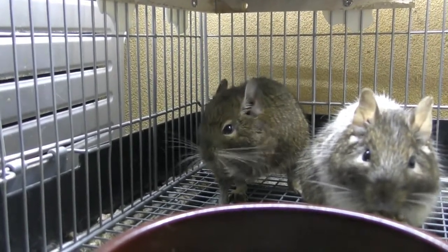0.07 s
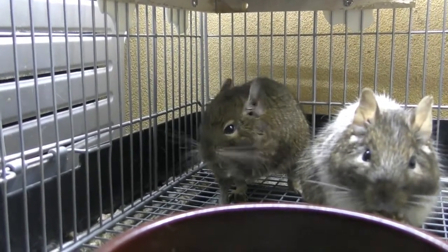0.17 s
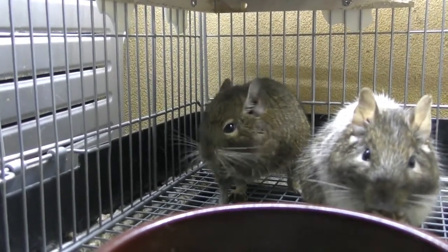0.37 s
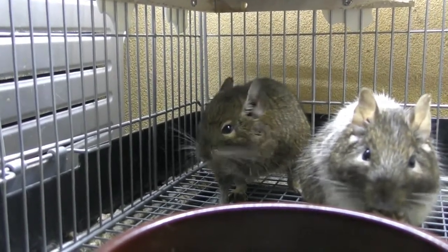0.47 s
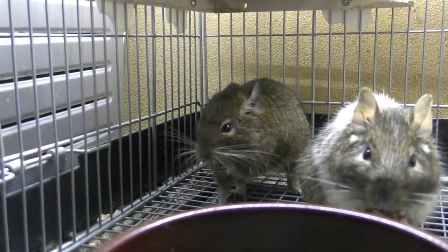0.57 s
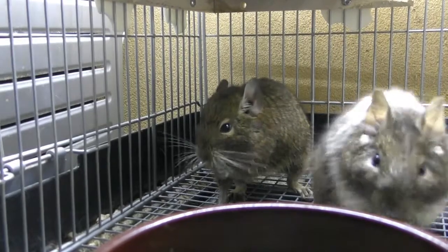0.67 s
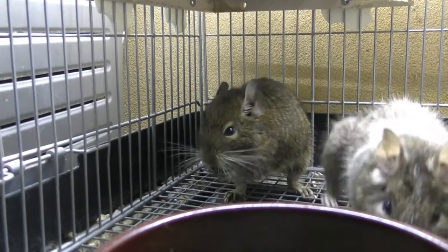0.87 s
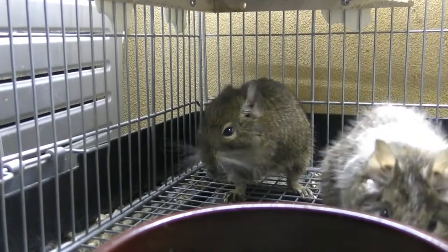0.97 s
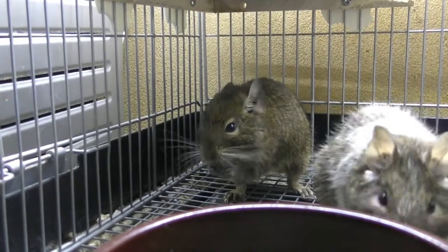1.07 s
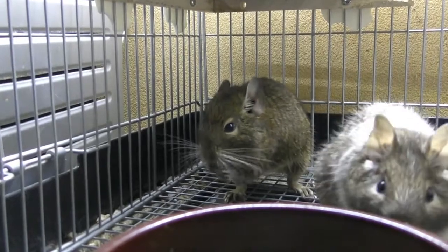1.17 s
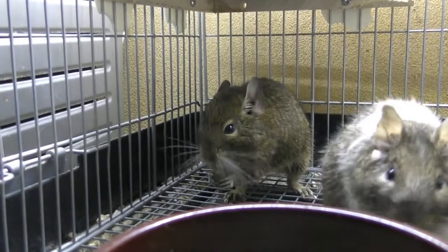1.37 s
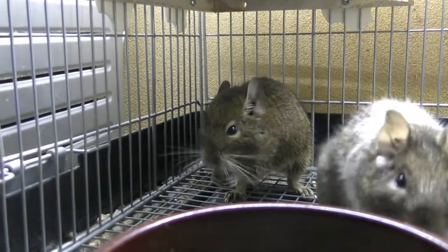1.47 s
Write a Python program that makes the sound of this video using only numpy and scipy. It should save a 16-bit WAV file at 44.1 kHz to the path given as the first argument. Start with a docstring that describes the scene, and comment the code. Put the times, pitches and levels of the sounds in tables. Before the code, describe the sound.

A small rodent gives three sharp, high, slightly raspy squeaks close by in a wire cage, at about 0.3, 0.6 and 1.1 seconds, each very brief and rising in pitch. Feet tick lightly on the mesh between the first two, clearest just before 0.6 seconds. Faint sniffs come about five times a second throughout. A low room noise dips at each squeak and swells back.

```python
"""Degu alarm squeaks

A degu in a wire cage gives three sharp, close squeaks: each reaches about 3.9 kHz, holds and breaks up,
its vocal folds ringing through the throat and rasping where they turn rough. Feet tick on the mesh,
and soft sniff-like puffs come about five times a second. A low room noise lies underneath;
the camera's gain control ducks it at each squeak and lets it swell back."""
import sys
import numpy as np
from scipy import signal
from scipy.fft import rfft, irfft, next_fast_len
from scipy.io import wavfile
from scipy.ndimage import uniform_filter1d, minimum_filter1d, map_coordinates

SR = 44100
rng = np.random.default_rng(int(sys.argv[2]) if len(sys.argv) > 2 else 0)


def store_pcm(level_fs):
    """Save levels as 16-bit WAV."""
    pcm = np.round(np.clip(level_fs, -1, 1) * 32767).astype(np.int16)
    wavfile.write(sys.argv[1], SR, np.atleast_2d(pcm).T)


N = 66150


def squeak(contour, harmonics=5):
    """Vocal-fold overtones shaped by the throat; rough stretches jitter, rasp and split."""
    # throat resonances: f/Hz, level/dB
    throat = [(2200, -13.5), (3050, -12), (3600, -21), (3860, -4), (4200, -14), (4600, -22.5), (5300, -3),
              (5720, -8.5), (6000, -4), (6500, -3.5), (7400, -3), (8300, -4.5), (9000, -2), (11200, 0),
              (12600, -4), (13600, -1.5), (15500, -13.5)]
    # how far the high overtones swing between the microphones: f/Hz, swing/dB
    beam = [(4000, 1.5), (8000, -0.5), (11500, 2), (15500, 4.5)]
    # the folds briefly alternate strong and weak cycles: start/s, end/s, gain of the in-between tones
    split = (.608, .640, .2)
    jitter, shimmer_db, rasp_db, rough_split = .05, 4, -10, .31  # at full roughness
    jitter_hz, flutter_hz, flutter_db = 1200, 170, 2.02
    swing_hz, left_lean, swing_rad_per_db = 82, .35, .12
    attack_s, release_s, dull_s, dull_db_per_octave = .00096, .0052, .016, -5

    t = np.arange(N) / SR
    times, *columns = np.transpose(contour)
    pitch, db, rough = [np.interp(t, times, column) for column in columns]
    rough = np.clip(rough, 0, 1)
    begin, end, share = split
    split_gain = rough_split * rough + share * np.sin(np.pi * np.clip((t - begin) / (end - begin), 0, 1))
    tilt = dull_db_per_octave * np.clip(1 + (t - times[-1]) / dull_s, 0, 1)  # the ending darkens
    phase = 2 * np.pi * np.cumsum(pitch * (1 + jitter * rough * wobble(jitter_hz))) / SR

    def partial(k):
        """The tone at k times the pitch, wavering on its own in level and stereo position."""
        hz = k * pitch
        level = amp(along(throat, hz) + tilt * np.log2(k) + flutter_db * wobble(flutter_hz))
        swing_db = along(beam, hz)
        turn = np.outer([1, -1], swing_rad_per_db * swing_db * wobble(swing_hz))
        balance = pan(swing_db * (left_lean + wobble(swing_hz)))
        return level * (hz < SR / 2) * balance * np.sin(k * phase + turn + 2 * np.pi * rng.random())

    voice = sum(partial(k) for k in range(1, harmonics + 1))
    voice += split_gain * sum(partial(k + .5) for k in range(1, harmonics))
    voice *= amp(shimmer_db * rough * wobble(jitter_hz))
    air = noise(lambda hz: amp(along(throat, hz)) * hz ** 4 / (hz ** 4 + 3050 ** 4))  # low cut
    rasp = amp(rasp_db) * rough * (1 + np.cos(phase)) * air  # pulses with the folds
    attack = np.clip((t - times[0]) / attack_s, 0, 1)
    release = np.exp(-np.maximum(t - times[-1], 0) / release_s)
    return amp(db) * attack * release * (voice + rasp)


def alarm_calls():
    """The degu's three squeaks, each with its own rise and break-up."""
    # one contour per squeak: t/s, f/Hz, level/dB, roughness/0-1
    contours = [
        [(.2455, 2800, -24.5, 1), (.252, 3123, -19.5, .95), (.258, 3520, -20, .8), (.265, 3700, -18.5, .55),
         (.273, 3822, -9.5, 0), (.285, 3890, -13, .04), (.292, 3800, -12, .04), (.297, 3664, -6, .04),
         (.303, 3703, -8.5, .05), (.310, 4100, -16.5, 0), (.321, 3890, -23, 0.43)],
        [(.610, 3716, -20.5, .3), (.614, 3606, -13.5, .04), (.621, 3747, -19.5, .08), (.625, 3792, -15, .06),
         (.642, 3850, -18.5, .03), (.659, 3897, -19.5, .06), (.663, 4130, -12, .45), (.671, 4138, -24, .3)],
        [(1.041, 2150, -28, .8), (1.048, 2573, -19.5, .7), (1.053, 3150, -15.5, .5), (1.060, 3520, -11.5, .6),
         (1.067, 3750, -13, .45), (1.080, 3860, -15, .08), (1.095, 3833, -14, .05), (1.101, 4150, -14.5, .08),
         (1.108, 4166, -8.5, .12), (1.116, 3550, -28.5, .35)],
    ]
    return sum(squeak(contour) for contour in contours)


def foot_ticks():
    """Feet touch the wire mesh: dry clicks that die within milliseconds."""
    # contacts: t/s, level/dB, decay/s
    contacts = [(0.345, -39.5, 0.0022), (0.534, -36, 0.0048), (0.5472, -43, 0.0047),
                (0.5629, -23.5, 0.0047)]
    # tone of the mesh: f/Hz, level/dB
    colour = [(500, -25), (1100, -6.5), (2200, 4), (3600, -5), (5700, 5.5), (7500, -2), (11000, -3),
              (16000, -12)]
    t = np.arange(N) / SR
    out = np.zeros((2, N))
    for start, db, decay in contacts:
        envelope = (t >= start) * np.exp(-np.abs(t - start) / decay)
        out += amp(db) * envelope * noise(lambda hz: amp(along(colour, hz)))
    return out


def puffs(rise_s=.02, decay_s=.031, pivot_hz=4000):
    """Soft sniff-like hisses that swell and fade, a little to the right."""
    # puffs: t/s, level/dB, time until the fade/s, treble tilt/dB per octave
    events = [(-.04, -41.5, 0.034, -1.5), (0.182, -39.5, 0.029, 0.7), (0.398, -41, 0.015, -0.5),
              (0.581, -37.5, 0.022, 7.5), (0.816, -38.5, 0.024, -2), (0.994, -39, 0.03, 1),
              (1.224, -43, 0.024, -1), (1.399, -39, 0.035, -1.5)]
    # tone of the hiss: f/Hz, level/dB
    colour = [(400, -18), (850, -13.5), (1200, 0), (2050, -18.5), (2450, -6.5), (3250, -9.5), (4500, -4),
              (6300, -18), (8000, -13.5), (16000, -18)]
    out = np.zeros((2, N))
    for start, db, length, tilt in events:
        t = np.arange(N) / SR - start
        envelope = np.clip(t / rise_s, 0, 1) * np.exp(-np.maximum(t - length, 0) / decay_s)
        hiss = noise(lambda hz: amp(along(colour, hz) + tilt * np.log2((hz + 100) / pivot_hz)))
        out += amp(db) * envelope * hiss
    return out * pan(db=-1.2)


def cage(x, echoes=10, spread_s=.006, walls_db=-11, room_t60_s=.073, room_db=-12.5):
    """Early echoes off the cage walls, then a short room tail that differs at each microphone."""
    t = np.arange(SR // 4) / SR
    tail = rng.standard_normal((2, len(t))) * amp(-60 * t / room_t60_s)
    response = amp(room_db) * tail / np.linalg.norm(tail[0])
    delays = 1 + (rng.random(echoes) * spread_s * SR).astype(int)
    response[:, delays] += amp(walls_db) * rng.choice([-1, 1], echoes) / np.sqrt(echoes)
    return x + signal.fftconvolve(x, response, axes=1)[:, :N]


def room_noise(rush_db=-47.5):
    """A steady low rush with a faint whirr in it."""
    # tone of the rush: f/Hz, level/dB
    colour = [(25, -9.5), (70, -6.5), (130, 0.5), (320, -1), (480, -3.5), (610, -13), (860, -13),
              (1250, -5), (2000, -13.5), (2600, -16.5), (3700, -19.5), (5500, -25.5), (7700, -29),
              (14000, -31), (16000, -41)]
    # narrow bands of the whirr: f/Hz, half-width/Hz, level/dB
    bands = [(328.3, 6.7, -60), (724.4, 26, -61.5), (1166.6, 22, -56.5)]
    # stereo balance: f/Hz, leftward pan/dB
    balance = [(100, 1), (400, 0), (1200, -0.8), (2400, -1.1), (8000, 0.5)]
    rush = amp(rush_db) * noise(lambda hz: amp(along(colour, hz)))
    whirr = sum(amp(db) * noise(lambda hz: 1 / (1 + ((hz - centre) / width) ** 2))
                for centre, width, db in bands)
    return filtered(rush + whirr, lambda hz: pan(along(balance, hz)))


def noise(colour):
    """Stereo noise of rms 1, shaped by the gain curve colour(hz)."""
    # stereo image: f/Hz, left-right likeness/0-1
    likeness = [(30, 0.85), (250, 0.95), (700, 0.88), (1300, 0.67), (4000, 0.66), (15000, 0.95)]

    def mid_side_gains(hz):
        angle = np.arccos(np.clip(along(likeness, hz), -1, 1)) / 2
        return colour(hz) * np.array([np.cos(angle), np.sin(angle)])

    mid, side = filtered(rng.standard_normal((2, N)), mid_side_gains)
    stereo = np.array([mid + side, mid - side])
    return stereo / np.sqrt(np.mean(stereo ** 2) + 1e-20)


def amp(db):
    """Decibels to gain."""
    return 10 ** (np.asarray(db) / 20)


def pan(db):
    """Stereo gains: left up by db, right down by as much."""
    return amp(np.array([[1], [-1]]) * db)


def along(points, hz):
    """Read a curve of (f/Hz, value) points on a log frequency axis."""
    freqs, values = np.transpose(points)
    return np.interp(np.log(hz + 1), np.log(freqs + 1), values)


def wobble(rate):
    """A smooth random curve with rate knots a second."""
    return map_coordinates(rng.standard_normal(N // 4), [np.arange(N) * rate / SR], mode="wrap")


def filtered(x, response):
    """Equalise x with the gain curve response(hz)."""
    size = next_fast_len(N + 8192)
    return irfft(rfft(x, size) * response(np.fft.rfftfreq(size, 1 / SR)), size)[..., :N]


def scene():
    """Squeaks and foot ticks in the cage, over the puffs and the room."""
    return cage(alarm_calls() + foot_ticks()) + puffs() + room_noise()


def gain_control(x, threshold_db=-19, depth_db=11, attack_s=.0024, hold_s=.025, recover_db_per_s=175):
    """Duck loud sound quickly by at most depth_db, hold, then let the gain climb back."""
    power = np.abs(uniform_filter1d(np.mean(x ** 2, axis=0), size=128))
    gain_db = np.clip(threshold_db - 10 * np.log10(power + 1e-12), -depth_db, 0)
    half_hold = int(hold_s * SR) // 2
    gain_db = minimum_filter1d(gain_db, 2 * half_hold + 1, origin=half_hold)
    climb_db = recover_db_per_s * np.arange(N) / SR
    gain_db = np.minimum.accumulate(gain_db - climb_db) + climb_db
    pole = np.exp(-1 / (attack_s * SR))
    return x * amp(signal.lfilter([1 - pole], [1, -pole], gain_db))


def record(dry):
    """The camera's gain control and treble cutoff."""
    return filtered(gain_control(dry), lambda hz: hz < 15900)


dry = scene()
out = record(dry)
store_pcm(out)
```